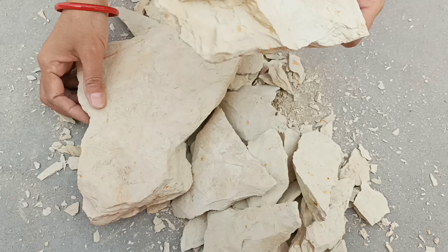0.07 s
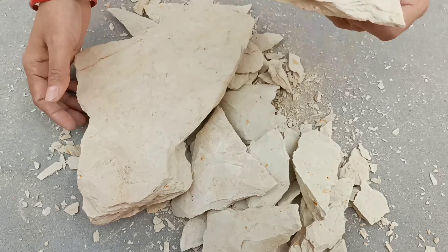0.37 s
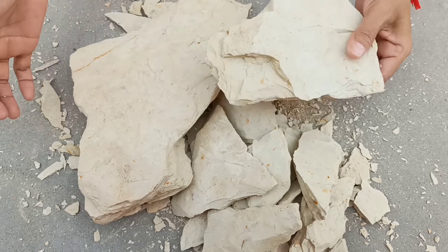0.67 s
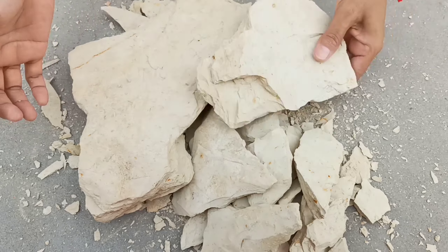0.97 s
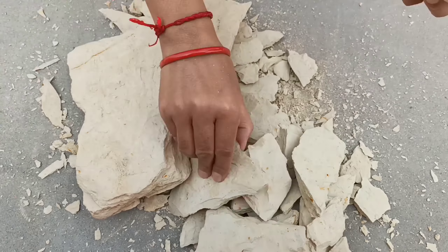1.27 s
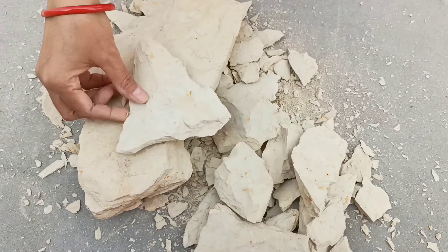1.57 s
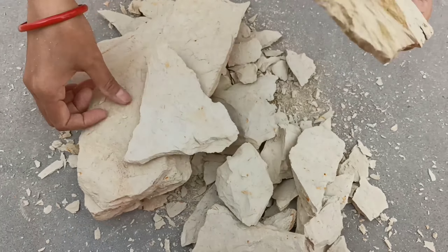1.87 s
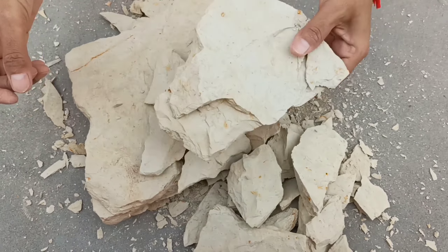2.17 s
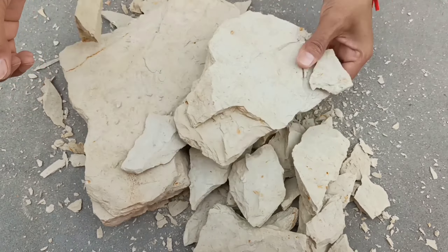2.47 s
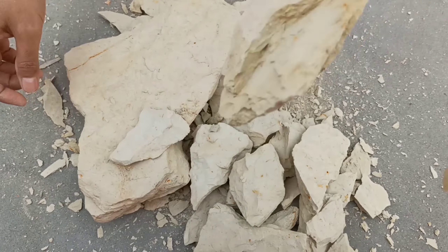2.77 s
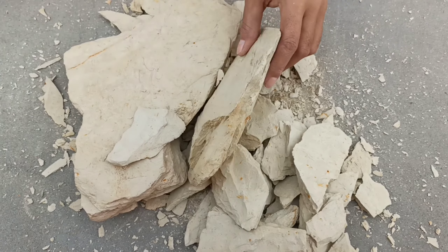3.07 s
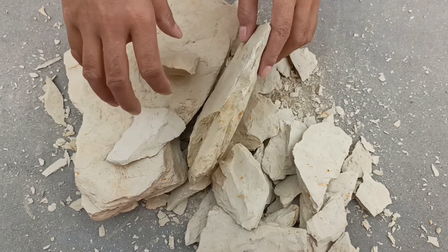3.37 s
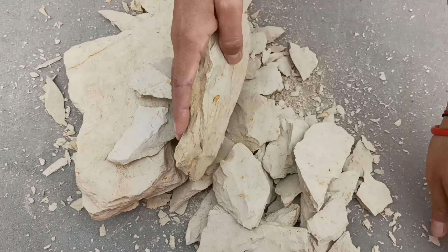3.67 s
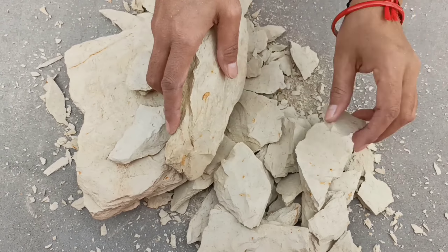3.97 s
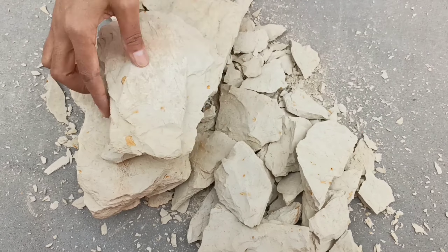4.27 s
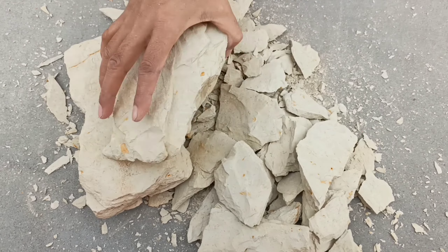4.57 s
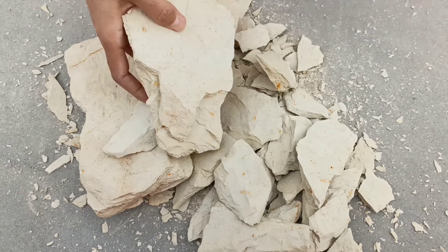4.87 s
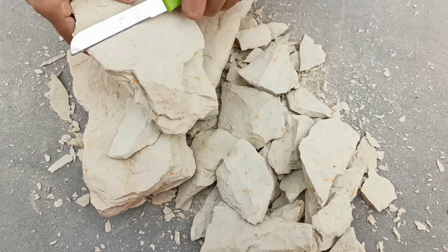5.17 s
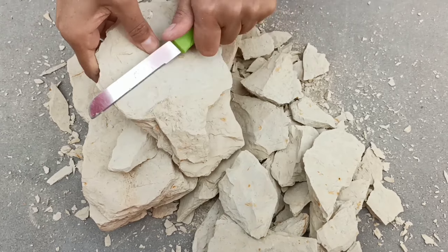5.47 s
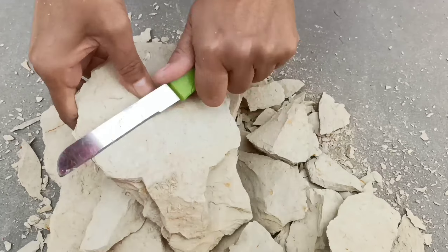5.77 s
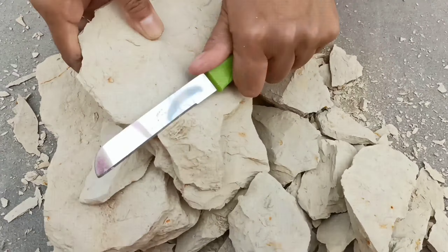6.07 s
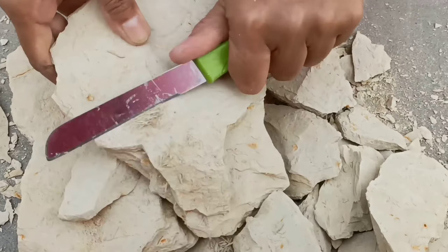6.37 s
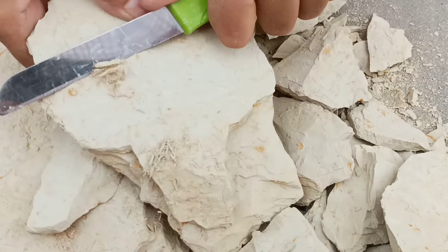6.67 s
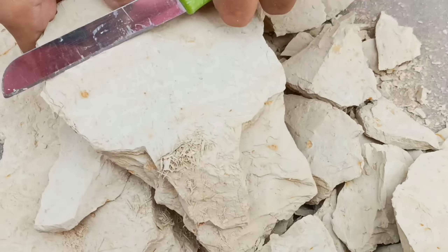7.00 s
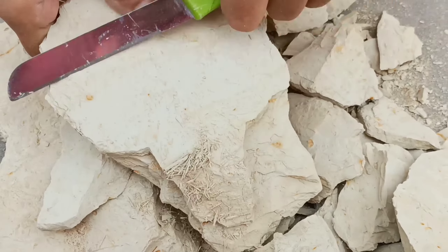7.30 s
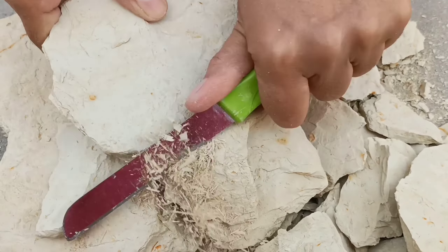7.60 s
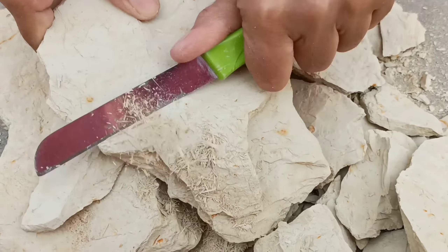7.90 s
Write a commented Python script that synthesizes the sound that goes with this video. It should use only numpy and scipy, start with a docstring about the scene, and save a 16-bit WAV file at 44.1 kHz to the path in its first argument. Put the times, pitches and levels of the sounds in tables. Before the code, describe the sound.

Dry clay slabs knock, clink and crumble together on a floor, then a knife shaves one in short gritty strokes.

```python
"""Clay slabs knocked and shaved

Dry slabs knock together on a floor indoors: they ring, clink, grind and crumble, and the floor booms.
A hand brushes the right microphone port; then a knife shaves one slab in short gritty strokes.
The microphones are close, and the hardest blows overload them."""
import sys
import numpy as np
from scipy import signal
from scipy.fft import rfft, irfft, next_fast_len
from scipy.io import wavfile
from scipy.ndimage import map_coordinates

SR = 44100
rng = np.random.default_rng(int(sys.argv[2]) if len(sys.argv) > 2 else 0)


def wav_out(sig):
    """Save sig, one row per channel (or a flat mono array), as 16-bit PCM at SR to the path in sys.argv[1]."""
    wavfile.write(sys.argv[1], SR, np.round(np.clip(np.atleast_2d(sig).T, -1, 1) * 32767).astype(np.int16))


N = 358974

# slabs landing on the pile: (time [s], boom level [dB])
LANDINGS = [(0.300, -26.5), (0.682, -24.5), (1.018, -24), (1.766, -22), (2.132, -26), (2.472, -26),
            (2.921, -31), (4.300, -34.5), (4.866, -28)]
# clay friction spectrum: (frequency [Hz], level [dB])
GRIND_SPECTRUM = [(200, -17.5), (700, 0.5), (1100, 1.5), (1500, 1.5), (2100, 5.5), (2600, -0.5),
                  (3400, 1.5), (5000, -7), (8000, -9), (11000, -12.5), (16000, -26)]


def amp(db):
    """Decibels to gain."""
    return 10 ** (np.asarray(db) / 20)


def unit(x):
    """Scale to rms 1."""
    return x / np.sqrt(np.mean(x ** 2) + 1e-20)


def along(points, hz):
    """Read (Hz, value) points on a log axis."""
    f, v = np.transpose(points)
    return np.interp(np.log(hz + 1), np.log(f + 1), v)


def clock(length_s):
    """Sample times of a short sound."""
    return np.arange(int(length_s * SR)) / SR


def decay(t, t60_s):
    """Envelope falling 60 dB in t60_s."""
    return amp(-60 * t / t60_s)


def resonance(hz, centre_hz, width_hz, db):
    """Hump of one resonance, in dB."""
    return db / (1 + (2 * (hz - centre_hz) / width_hz) ** 2)


def wobble(rate_hz, size):
    """Random curve of rms near 1, rate_hz knots per SR points."""
    knots = rng.standard_normal(int(size * rate_hz / SR) + 4)
    return 1.15 * np.interp(np.arange(size) * rate_hz / SR, np.arange(len(knots)), knots)


def filtered(x, response):
    """Apply a complex frequency response."""
    n = x.shape[-1]
    m = next_fast_len(n + 4096)
    return irfft(rfft(x, m) * response(np.fft.rfftfreq(m, 1 / SR)), m)[..., :n]


def coloured(x, level_db):
    """Minimum-phase filter with magnitude level_db(hz)."""
    size = 2048
    cepstrum = irfft(np.log(amp(level_db(np.fft.rfftfreq(size, 1 / SR))) + 1e-6))
    causal_fold = 1 + np.sign(size / 2 - np.arange(size))
    causal_fold[0] = 1
    kernel = irfft(np.exp(rfft(cepstrum * causal_fold)))
    return signal.fftconvolve(x, kernel)[:len(x)]


def add(track, start_s, x):
    """Mix x into the track."""
    i = max(round(start_s * SR), 0)
    part = x[..., :max(N - i, 0)]
    track[..., i:i + part.shape[-1]] += part


def panned(x, side_db):
    """Two ports, left louder by side_db."""
    return x * unit(amp([[side_db / 2], [-side_db / 2]]))


def panned_by_band(x, sides):
    """Two ports, balanced by (Hz, left over right dB) points."""
    return filtered(x, lambda hz: amp(np.outer([.5, -.5], along(sides, hz))))


def work_side_db(time_s):
    """Balance of one contact, scattered round where the hands work."""
    # work moves from left to middle: (time [s], left over right [dB])
    path = [(0.7, 6.5), (4.7, 7), (5.6, 5), (6, -1), (7.1, -3.5), (8, -0.5)]
    return np.interp(time_s, *np.transpose(path)) + 2.5 * rng.standard_normal()


def grit(size, spiky):
    """Noise of tiny fractures of very unequal strength."""
    return unit(rng.standard_normal(size) * np.exp(spiky * wobble(4000, size)))


def stroke(length_s, level_db, treble_db, hinge_hz, spiky, judder_db, edge_s):
    """Friction grains under a pressure that swells, judders and lets go; 20 ms lead-in."""
    t = clock(length_s + .08) - .02
    pressure = (1 + np.tanh(t / edge_s)) * (1 + np.tanh((length_s - t) / (1.027 * edge_s))) / 4
    grains = grit(len(t), spiky) * amp(judder_db * wobble(260, len(t)))
    progress = np.clip(t / length_s, 0, 1)
    tilt_db = lambda hz: treble_db / 2 * np.tanh(2 * np.log((hz + 1) / hinge_hz))
    colour = lambda hz: level_db(hz) + tilt_db(hz) + 2.5 * wobble(2670, len(hz))
    # small resonances change as the contact moves: crossfade two random ripples
    sound = sum(coloured(grains * pressure * share, colour) for share in (progress, 1 - progress))
    return unit(sound) * np.sqrt(length_s * SR / len(t))


def air():
    """Low, slowly shifting room noise; a narrow hum swells once."""
    # room noise: (frequency [Hz], level [dB])
    air_spectrum = [(15, -66), (25, -27), (82, 2), (195, 4), (405, -5.5), (476, -12.5), (936, -20.5),
                    (1070, -16.5), (1260, -26), (1700, -23), (1840, -27.5), (3430, -29), (7710, -48),
                    (11000, -41), (16000, -69)]
    hum_hz, hum_mid_s, hum_half_s = 258, 7.7, .38
    t = np.arange(N) / SR
    common, own = rng.standard_normal(N), rng.standard_normal((2, N))
    own = filtered(own, lambda hz: along([(100, .45), (500, .95), (2000, 3)], hz))
    noise = filtered(common + own, lambda hz: amp(along(air_spectrum, hz)))
    hum = filtered(rng.standard_normal(N), lambda hz: np.exp(-((hz - hum_hz) / 42) ** 2))
    level_db = -50.5 - 3.5 * np.exp(-t / .69) + 1.8 * wobble(7.6, N)
    swell = 1 / (1 + ((t - hum_mid_s) / hum_half_s) ** 10)
    return amp(level_db) * unit(noise) + amp(-52) * swell * unit(hum)


def room(x):
    """Diffuse tail; each frequency dies at its own rate."""
    # room decay: (frequency [Hz], t60 [s])
    walls = [(80, .7), (170, 0.44), (400, .36), (1100, 0.26), (3000, 0.21), (10000, 0.088)]
    hz, t, bins = signal.stft(rng.standard_normal((2, SR // 2)), SR, nperseg=256)
    tail = signal.istft(bins * decay(t, along(walls, hz)[:, None]), SR, nperseg=256)[1]
    tail *= 1 - np.exp(-np.arange(tail.shape[1]) / SR / .0062)
    return signal.fftconvolve(x, tail / np.linalg.norm(tail[0]), axes=1)[:, :N]


def early_echoes(x):
    """Floor and pile scatter weak treble copies, different at each port."""
    t = clock(.015)
    scatter = rng.standard_normal((2, len(t))) * np.exp(-t / .002) * (t > .0003)
    scatter /= np.linalg.norm(scatter, axis=1, keepdims=True)
    echoes = signal.fftconvolve(x, scatter, axes=1)[:, :N]
    return filtered(echoes, lambda hz: amp(along([(1100, -22), (2500, -8), (6000, -5)], hz)))


def hand():
    """A hand bumps and brushes the right port; the left hardly hears it."""
    # finger bumps: (time [s], level [dB], pitch [Hz])
    bumps = [(1.322, -12.5, 596), (1.331, -11.5, 625), (1.436, -20.5, 172), (1.500, -8, 125.2),
             (4.826, -12, 575), (5.450, -18, 309), (5.5, -1.5, 520), (5.592, -17.5, 970), (5.7296, -2, 520),
             (5.740, -12.5, 300)]
    # skin brushes: (time [s], length [s], level [dB], treble [dB])
    brushes = [(1.333, 0.082, -33, 17.5), (5.452, 0.066, -42, 16), (5.539, 0.089, -38, 19),
               (5.704, 0.013, -17, 6), (5.717, 0.028, -32, 1)]
    # skin on the port: (frequency [Hz], level [dB])
    skin_spectrum = [(30, -8), (100, 13.5), (500, 12.5), (1100, 6.5), (2000, -7.5), (4500, -14.5),
                     (8000, -34.5), (15000, -40)]
    skin_db = lambda hz: along(skin_spectrum, hz)
    out, t = np.zeros(N), clock(.08)
    for start_s, db, pitch_hz in bumps:
        push = np.sin(2 * np.pi * pitch_hz * t) * decay(t, 2.8 / pitch_hz)
        burst = rng.standard_normal(len(t)) * decay(t, .004)
        tap = coloured(burst, lambda hz: skin_db(hz) + 3 * np.log2(hz / 1000 + 1))
        touch = push / abs(push).max() + .66 * np.sqrt(pitch_hz / 600) * tap / abs(tap).max()
        # the port leaks slow pressure
        bump = coloured(touch, lambda hz: -10 * np.log10(1 + (.4 * pitch_hz / (hz + 5)) ** 2))
        add(out, start_s, amp(db) * bump)
    for start_s, length_s, db, treble_db in brushes:
        brush = stroke(length_s, skin_db, treble_db,
                       hinge_hz=1340, spiky=.23, judder_db=3.5, edge_s=.0056)
        add(out, start_s - .02, amp(db) * brush)
    return out * amp([[-27], [0]])


def floor_rumble():
    """The floor takes each landing with a low push; its boom builds and hangs in the room."""
    # floor boom: (frequency [Hz], level [dB])
    floor_spectrum = [(25, -27.5), (55, -8), (85, 5), (115, 1), (170, 2), (300, -5.5), (420, -9.5),
                      (700, -31.5), (2000, -22.5), (6000, -63.5)]
    # floor resonances: (centre [Hz], width [Hz], gain [dB])
    boards = [(83.1, 11, 5.5), (189, 90, 4), (208, 27, 4), (316, 67, 8)]
    floor_db = lambda hz: along(floor_spectrum, hz) + sum(resonance(hz, *mode) for mode in boards)
    push_db = lambda hz: along([(60, -23), (230, 9), (600, -5), (1500, -32.5)], hz)
    out, t = np.zeros((2, N)), clock(.49)
    swell = (1 - np.exp(-(t / .029) ** 2)) * decay(t, .36)
    for start_s, db in LANDINGS:
        low_hz = 70.1 * 2 ** ((-25 - db) / 10.5)  # lighter landings reach less deep
        noise = rng.standard_normal(len(t)) + .48 * rng.standard_normal((2, len(t)))
        boom = filtered(noise, lambda hz: amp(floor_db(hz)) * hz ** 3 / np.hypot(hz ** 3, low_hz ** 3))
        push = coloured(rng.standard_normal(len(t)) * decay(t, .045), push_db)
        add(out, start_s, amp(db - 14.5) * unit(boom * swell) + amp(db + 1) * push / abs(push).max())
    return out


def crumbs():
    """Each landing sheds crumbs that patter down, ever fewer and smaller."""
    out, t = np.zeros((2, N)), clock(.0071)
    for start_s, boom_db in LANDINGS:
        delays_s = rng.exponential(.05, size=12)
        for delay_s, (size, pitch, side) in zip(delays_s, rng.standard_normal((len(delays_s), 3))):
            ring_hz = 5500 * np.exp(.35 * pitch)
            colour = lambda hz: along(GRIND_SPECTRUM, hz) + resonance(hz, ring_hz, 4000, db=5)
            tick = unit(coloured(rng.standard_normal(len(t)) * decay(t, .0059), colour))
            db = boom_db - 31.5 + 3.2 * size - 110 * delay_s
            add(out, start_s + .025 + delay_s, panned(amp(db) * tick, 5 + 3 * side))
    return out


def rubbing():
    """Rough faces grind and excite a resonance of the piece; each landing skids briefly."""
    # clay on clay: (time [s], length [s], level [dB], treble [dB], resonance [Hz])
    rubs = [(2.485, 0.082, -32.5, -11.5, 2010), (2.636, 0.023, -39, -5, 4400),
            (2.936, 0.033, -30.5, -9, 4520), (2.972, 0.11, -42, -10.5, 4270), (3.1, 0.014, -43, 24, 6000),
            (3.224, 0.042, -48.5, 1.5, 7260), (3.853, 0.065, -53, 0, 4160), (4.1, 0.015, -31, -9, 4430),
            (4.21, 0.033, -34, -0.5, 2900), (4.296, 0.052, -33.5, -64, 1600),
            (4.576, 0.036, -32.5, -5, 3400), (4.779, 0.013, -27, 0, 2860), (4.934, 0.011, -34, -51, 2060),
            (5.255, 0.05, -41.5, -6, 4360)]
    skids = [(start_s + .032, .065, db - 19.5, -11.5, 1613) for start_s, db in LANDINGS]
    out = np.zeros((2, N))
    for start_s, length_s, db, treble_db, ring_hz in rubs + skids:
        colour = lambda hz: along(GRIND_SPECTRUM, hz) + resonance(hz, ring_hz, .13 * ring_hz, db=7)
        rub = stroke(length_s, colour, treble_db + 8,
                     hinge_hz=4500, spiky=.75, judder_db=4.5, edge_s=.003)
        add(out, start_s - .02, panned(amp(db - 4) * rub, work_side_db(start_s)))
    return out


def clinks():
    """Sharp clicks and clinks: chips snapping, the blade tapping the slab, the slab pinging near 2 kHz."""
    # clicks and clinks: (time [s], level [dB], pitch [Hz], ring over click [dB])
    ticks = [(0.678, -30, 3000, 2), (0.7387, -13.5, 2974, 10.5), (0.92, -46, 3360, 3),
             (1.298, -33, 2140, 13), (1.43, -19.5, 3570, -20), (1.6559, -22, 3580, 19),
             (1.762, -7, 4200, 4), (1.7686, -10.5, 1964, 27), (2.1318, -9.5, 6250, -4),
             (2.204, -16, 2000, 18), (2.315, -39, 3030, 8), (2.6151, -28, 2870, -1),
             (2.6326, -23.5, 6820, 12), (2.7544, -39, 2950, 1), (2.7856, -38.5, 2820, 1.5),
             (2.832, -25.5, 2720, -17), (2.9244, -9, 3200, 8.5), (2.9982, -26, 4320, -5),
             (3.1598, -40, 6270, -0.5), (4.338, -16.5, 2050, 33), (4.5657, -22.5, 3430, 3.5),
             (4.6627, -19, 1990, 20), (4.775, -24.5, 5470, 18), (4.8009, -24, 5700, -3),
             (5.1532, -32, 2590, 11), (5.9418, -13.5, 4610, 1), (6.2443, -35.5, 3390, 4),
             (6.2882, -22, 2600, 14), (7.027, -24, 4450, 2), (7.192, -22, 3460, 21),
             (7.3532, -29, 1870, -5), (7.4275, -29, 5480, 19), (7.662, -22.5, 3460, 6),
             (7.6872, -27.5, 3160, 11), (7.8098, -22.5, 2050, -4.5)]
    click_db = lambda hz: along(GRIND_SPECTRUM, hz) + 3 * np.log2(hz / 3000 + 1)
    out, t = np.zeros((2, N)), clock(.077)
    for start_s, db, pitch_hz, ring_db in ticks:
        weak_hz = np.clip(pitch_hz * np.exp(rng.normal(0, .4, size=(7, 1))), 900, 10000)
        weak_modes = np.sin(2 * np.pi * weak_hz * t) * decay(t, .015)
        t60_s = .027 * np.sqrt(3000 / pitch_hz)  # higher pitches die sooner
        ring = np.sin(2 * np.pi * pitch_hz * t) * decay(t, t60_s)
        ring = ring + rng.normal(.28, .25, size=(2, 7)) @ weak_modes  # own mix at each port
        click = coloured(grit(len(t), spiky=.4) * decay(t, .025), click_db)
        tick = (amp(ring_db) * unit(ring) + unit(click)) * (1 - np.exp(-t / .00057))
        add(out, start_s, panned(amp(db - 20.5) * unit(tick), work_side_db(start_s)))
    return out


def sliding(bites):
    """Hand and blade slide lightly over the clay; the edge drags into and out of each bite."""
    # light contact: (time [s], level [dB])
    contact = [(2.8, -66), (3.05, -55), (3.25, -79), (3.6, -63.5), (4.1, -66.5), (4.7, -62.5), (5.2, -54),
               (6.2, -61.5), (6.75, -53), (7.0, -74), (7.45, -56), (8.14, -73)]
    spectrum_hz_db = [(500, 2.5), (1500, 0), (3500, 4), (8500, -8), (12000, -7), (16000, -26)]
    t = np.arange(N) / SR
    catching = amp(2.5 * wobble(70, N) + 3 * wobble(16, N))
    friction = filtered(grit(N, spiky=.84) * catching, lambda hz: amp(along(spectrum_hz_db, hz)))
    touch = (t > contact[0][0]) * amp(np.interp(t, *np.transpose(contact)))
    drag = np.zeros(N)
    for start_s, length_s, db, _ in bites:
        away_s = np.maximum(abs(t - start_s - length_s / 2) - length_s / 2, 0)
        drag = np.maximum(drag, amp(db - 17.5) * np.exp(-away_s / .028))
    return (touch + drag) * unit(friction)


def knife():
    """The edge shaves off powder in bites, each with its own blade resonance."""
    # blade bites: (time [s], length [s], level [dB], resonance [Hz])
    bites = [(5.609, 0.025, -30.5, 3900), (5.641, 0.031, -31.5, 4240), (5.76, 0.045, -42.5, 1790),
             (5.858, 0.073, -32.5, 2040), (5.976, 0.021, -33.5, 1820), (6.028, 0.0093, -37.5, 5300),
             (6.096, 0.076, -40.5, 3580), (6.27, 0.055, -40.5, 2650), (6.349, 0.046, -38, 7500),
             (6.462, 0.045, -30, 3620), (6.609, 0.019, -44.5, 4250), (6.769, 0.018, -25.5, 7350),
             (6.865, 0.041, -28.5, 3700), (7.1, 0.04, -26.5, 7700), (7.172, 0.03, -30.5, 7800),
             (7.298, 0.013, -42.5, 7190), (7.404, 0.032, -38.5, 6100), (7.625, 0.043, -28, 6840),
             (7.918, 0.069, -29, 4320)]
    # shaving noise: (frequency [Hz], level [dB])
    shave_spectrum = [(400, -34), (700, -7.5), (1100, -14.5), (1500, 1.5), (2100, -1.5), (3500, 4.5),
                      (4500, 5), (6300, 0), (8200, -1), (9500, -3), (11300, -8.5), (12700, -33),
                      (15000, -22), (16500, -20)]
    # knife resonances: (centre [Hz], width [Hz], gain [dB])
    steel_modes = [(1040, 120, 16), (2700, 150, -3), (3230, 360, 7.5), (5150, 770, 2.5), (8500, 1700, 5.5)]
    # knife balance: (frequency [Hz], left over right [dB])
    knife_sides = [(1000, 5), (2100, 9), (4000, 0.5), (8000, -4), (13000, 12)]
    steel_db = lambda hz: along(shave_spectrum, hz) + sum(resonance(hz, *mode) for mode in steel_modes)
    out = np.zeros((2, N))
    for start_s, length_s, db, ring_hz in bites:
        treble_db = db + 34.5  # firmer is brighter
        colour = lambda hz: steel_db(hz) + resonance(hz, ring_hz, .089 * ring_hz, db=7)
        bite = stroke(length_s, colour, treble_db,
                      hinge_hz=5200, spiky=.5, judder_db=4.5, edge_s=.12 * length_s)
        add(out, start_s - .02, panned(amp(db - 2) * bite, work_side_db(start_s)))
    left, right = panned_by_band(out + sliding(bites), knife_sides)
    lag_s = .00013 + .00004 * wobble(7, N)  # wanders as the blade moves
    return np.array([left, map_coordinates(right, [np.arange(N) - lag_s * SR], order=3)])


def rocking(start_s, count, gap_s, pitch_hz):
    """Knock rows of a slab rocking to rest on its edge: ever sooner, softer, duller and shorter."""
    times_s = start_s + np.append(0, np.cumsum(gap_s * .58 ** np.arange(count - 1)))
    return [(time_s, -21.5 - 1.2 * k, pitch_hz, -17 - 2.5 * k, -4 - 2.5 * k, .16 * .72 ** k)
            for k, time_s in enumerate(times_s)]


def knocks():
    """Each blow crushes the contact with a crack and rings the slab's damped modes."""
    # slab on slab: (time [s], level [dB], pitch [Hz], relative crack [dB], overtones [dB])
    blows = [(0.2993, 2.5, 1081, -20.5, 2), (0.4823, -42.5, 1077, -19.5, -5),
             (0.6809, -9.5, 1059, -12.5, 7), (1.0189, -8.5, 1047, -12.5, 3.5),
             (1.5958, -12, 1085, -21.5, -6), (1.6562, -29.5, 1046, -4.5, 5), (1.7647, -16, 1026, -9.5, -11),
             (1.7688, -13, 1085, -14, -14), (2.1316, 0, 1080, -15.5, -6), (2.2271, -23.5, 1090, -14, 6),
             (2.2463, -28.5, 1074, -23, 1), (2.2558, -30.5, 1083, -11, -7), (2.368, -40, 1064, -9, 10),
             (2.4725, -14.5, 1078, -10.5, -15), (2.4824, -19, 1073, -9.5, 10), (2.505, -26, 1068, -17, -4),
             (2.544, -23, 1080, -28, -7), (2.6327, -37.5, 1105, 4, -4), (2.92, -19.5, 1050, -4, 8),
             (2.9329, -13.5, 1102, -17.5, -19), (3.0105, -36, 1072, -13, 3), (3.929, -42.5, 1120, -27, -6),
             (3.9915, -48, 1116, -31, -10), (4.293, -32.5, 1097, -12.5, 1), (4.3109, -39.5, 1065, -2, 5),
             (4.337, -29, 1110, -8.5, 10), (4.6213, -41, 1090, -11, 0), (4.664, -38, 1140, -3, 4),
             (4.867, -38, 1065, -17, 18.5), (4.9319, -34.5, 1120, -11, 15), (6.402, -40.5, 1105, -15, -5),
             (7.69, -43, 1086, -14, -1), (7.953, -38, 1090, -17, -3)]
    # slab modes: (frequency [Hz], level [dB], share of t60 [ratio])
    slab_modes = [(1100, 1, 1), (1540, -28.5, 0.86), (1679, -11, 0.57), (2048, -13, 1), (2875, -32, 0.48),
                  (3230, -19, 0.58), (4130, -31, .4), (5500, -37, 0.32)]
    base_hz = slab_modes[0][0]
    # append t60 [s]: hard blows damp the ring
    held = [(start_s, db, *timbre, .069 / (1 + .55 * amp(db))) for start_s, db, *timbre in blows]
    rocked = rocking(start_s=3.428, count=5, gap_s=.073, pitch_hz=1102)
    # crushed contact: (frequency [Hz], level [dB])
    crack_spectrum = [(100, -4), (400, -1), (900, -0.5), (1400, 12), (2500, -0.5), (4200, -5.5),
                      (6000, -16), (9000, -26), (12000, -26.5), (16000, -43)]
    crack_colour = lambda hz: along(crack_spectrum, hz) + 1.5 * wobble(2000, len(hz))
    out, t = np.zeros(N), clock(.21)
    crushing = (1 - np.exp(-t / .00016)) * np.exp(-t / .0024)
    for start_s, db, pitch_hz, crack_db, overtones_db, t60_s in held + rocked:
        ring = np.zeros(len(t))
        for mode_hz, mode_db, share in slab_modes:
            upper = mode_hz > 1.2 * base_hz  # these vary with strike point and grip
            detune = 1 + upper * rng.normal(0, .018)
            tone = np.sin(2 * np.pi * mode_hz * pitch_hz / base_hz * detune * t)
            gain = amp(mode_db + upper * (overtones_db + rng.normal(0, 2.5)))
            mode_t60_s = np.clip(t60_s * share, .005, .045 if upper else .2)
            ring += gain * tone * decay(t, mode_t60_s)
        add(out, start_s, amp(db + 2) * ring * (1 - np.exp(-t / .0015)))
        crack = coloured(grit(len(t), spiky=.38) * crushing, crack_colour)
        add(out, start_s, amp(db + crack_db - 10.5) * unit(crack))
    return out


def scene():
    """Stereo mix; the pile lies a little left, so it reaches the right port later."""
    # pile balance: (frequency [Hz], left over right [dB])
    pile_sides = [(200, 6), (1060, 3.5), (2100, 5), (4000, 1), (9000, 20.5)]
    # left port's lead for the pile: (frequency [Hz], phase [rad])
    left_lead = [(100, 0.074), (500, .3), (1065, 1.31), (1500, 2), (2070, 4.7), (3200, 4.6), (5000, 5.9),
                 (9000, 10.6), (16000, 19.5)]
    clay = panned_by_band(knocks(), pile_sides) + clinks() + rubbing() + crumbs()
    clay = filtered(clay, lambda hz: np.exp(-1j * np.outer([0, 1], along(left_lead, hz))))
    direct = clay + knife()
    return direct + early_echoes(direct) + amp(-21) * room(direct) + floor_rumble() + hand() + air()


def record(dry):
    """The input opens after a moment, limits the band and rounds off peaks at full scale."""
    # microphone treble: (frequency [Hz], gain [dB])
    mic_response = [(5000, 0), (8000, 0), (10500, -4), (13000, -9.5), (15500, -7.5)]
    open_s, fade_s, low_hz, top_hz = .09, .04, 28, 16200
    opened = dry * np.clip((np.arange(N) / SR - open_s) / fade_s, 0, 1)
    highpassed = signal.sosfilt(signal.butter(2, low_hz, "high", fs=SR, output="sos"), opened)
    heard = filtered(highpassed, lambda hz: amp(along(mic_response, hz)))
    clipped = heard / (1 + abs(heard) ** 6) ** (1 / 6)
    return filtered(clipped, lambda hz: 1 / (1 + (hz / top_hz) ** 80))


dry = scene()
out = record(dry)
wav_out(out)
```